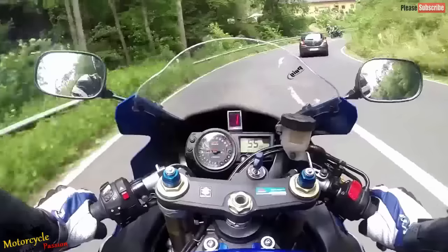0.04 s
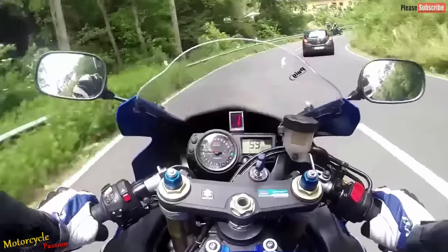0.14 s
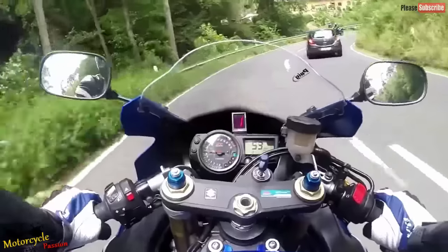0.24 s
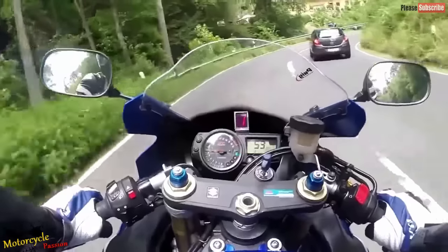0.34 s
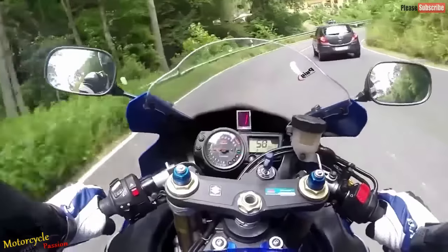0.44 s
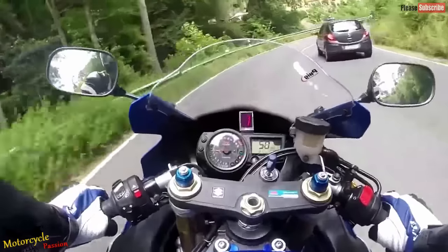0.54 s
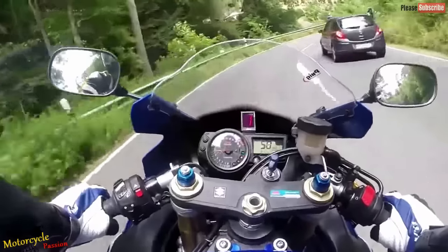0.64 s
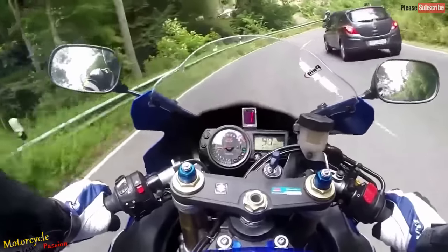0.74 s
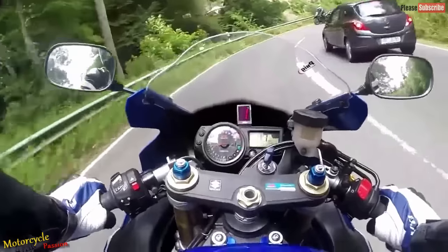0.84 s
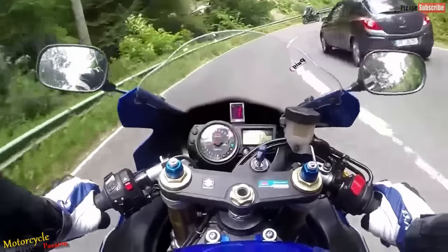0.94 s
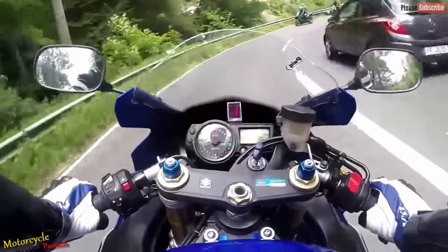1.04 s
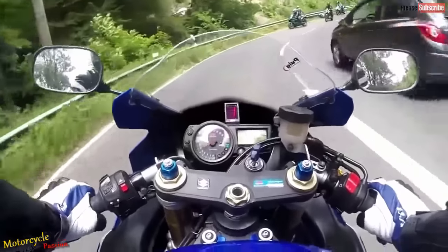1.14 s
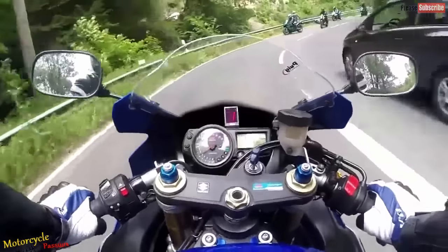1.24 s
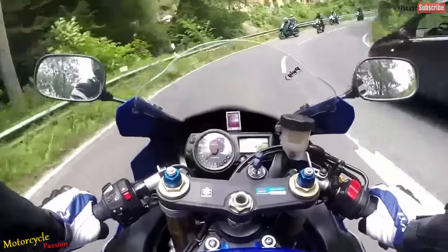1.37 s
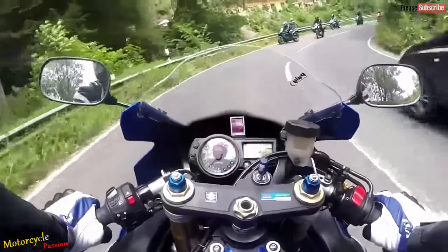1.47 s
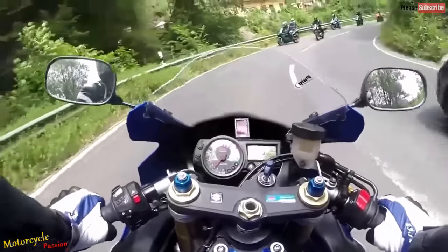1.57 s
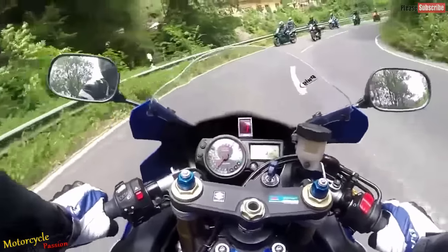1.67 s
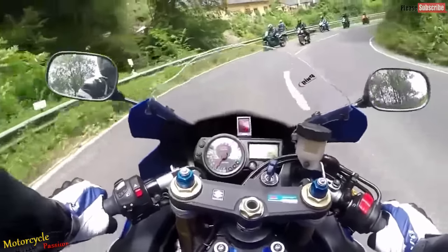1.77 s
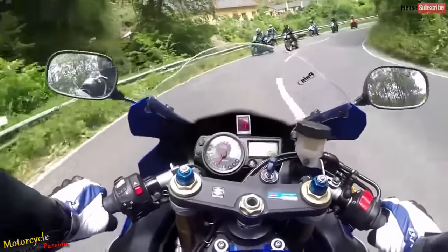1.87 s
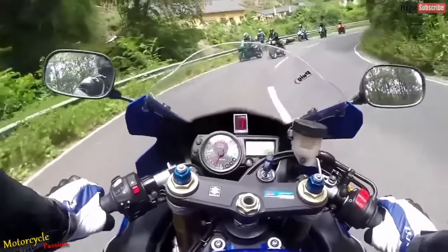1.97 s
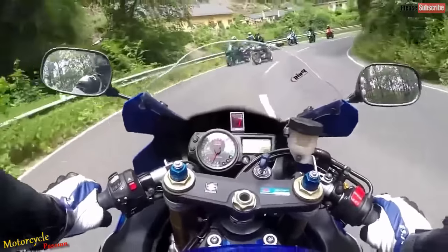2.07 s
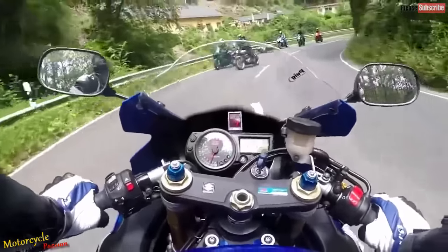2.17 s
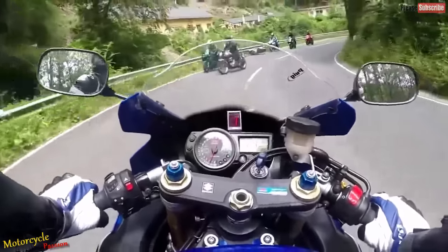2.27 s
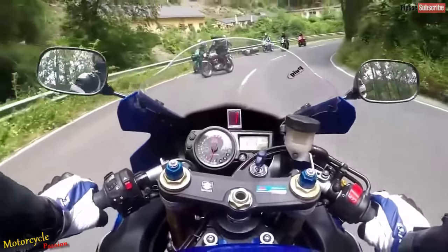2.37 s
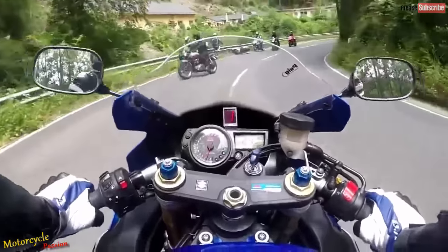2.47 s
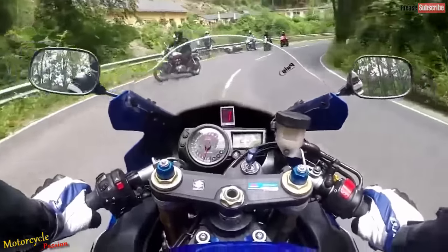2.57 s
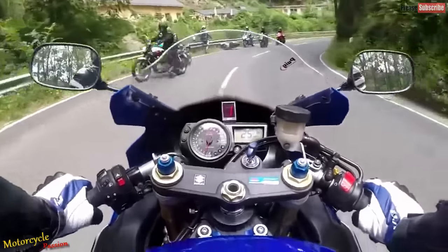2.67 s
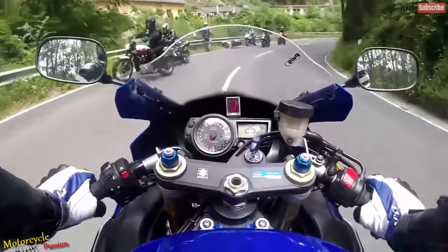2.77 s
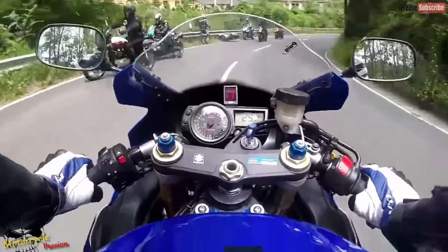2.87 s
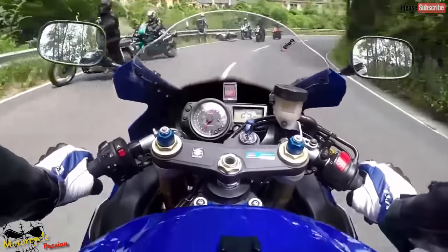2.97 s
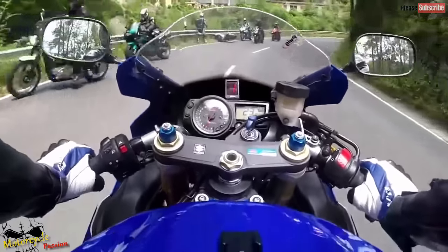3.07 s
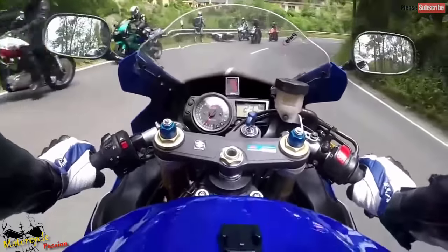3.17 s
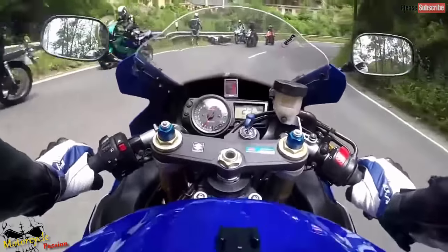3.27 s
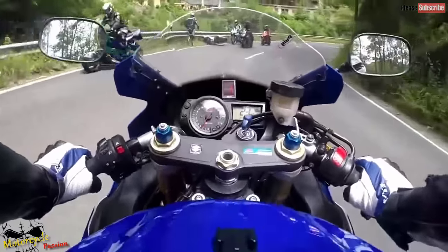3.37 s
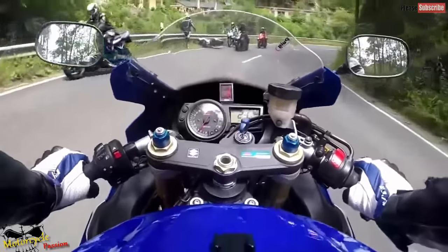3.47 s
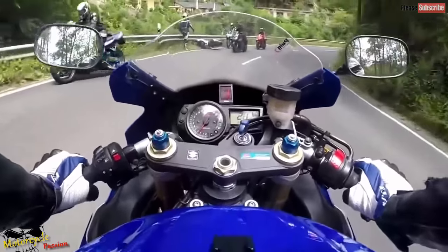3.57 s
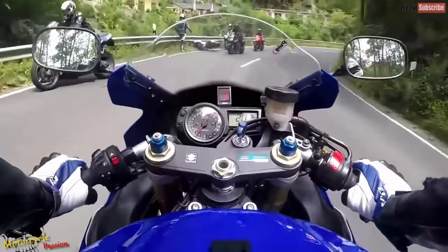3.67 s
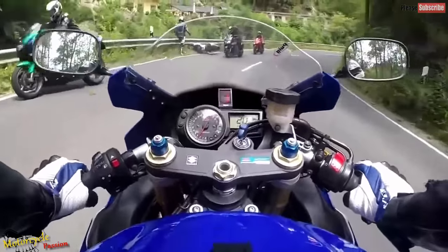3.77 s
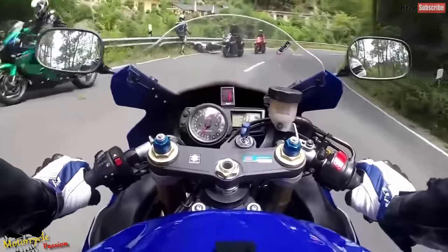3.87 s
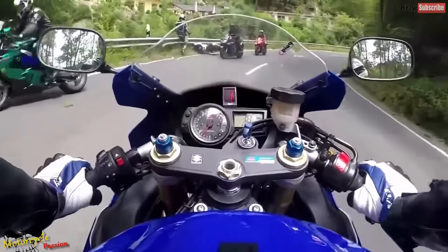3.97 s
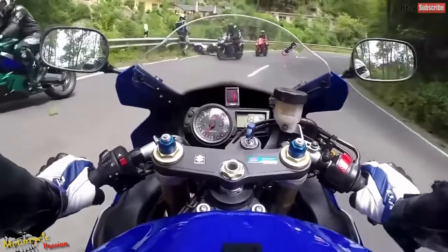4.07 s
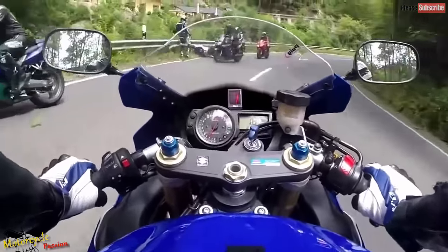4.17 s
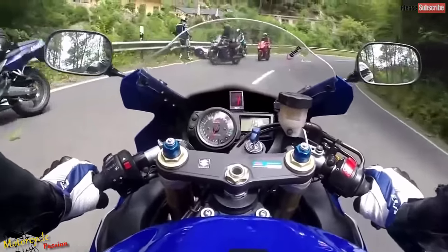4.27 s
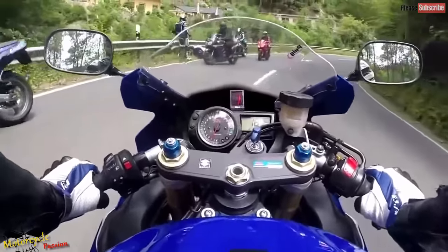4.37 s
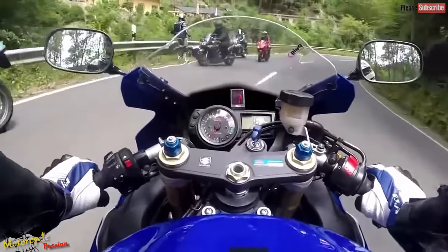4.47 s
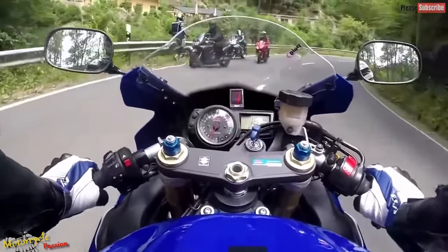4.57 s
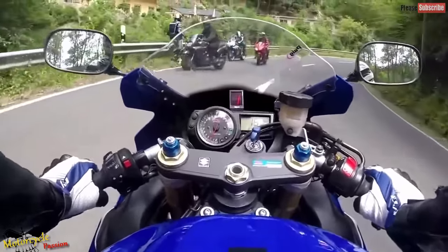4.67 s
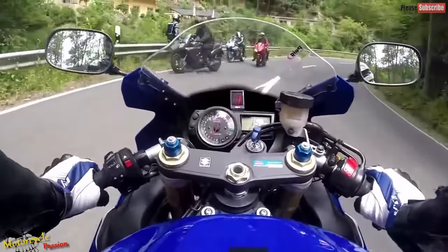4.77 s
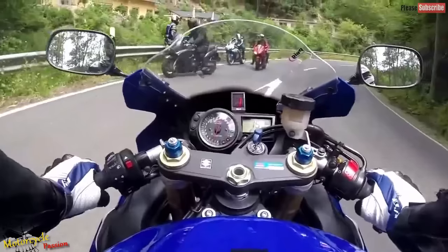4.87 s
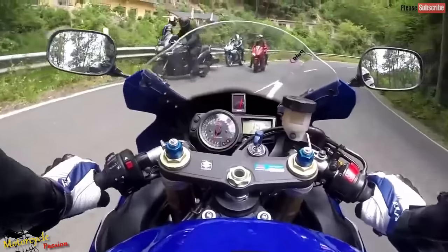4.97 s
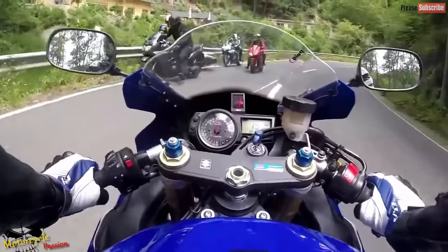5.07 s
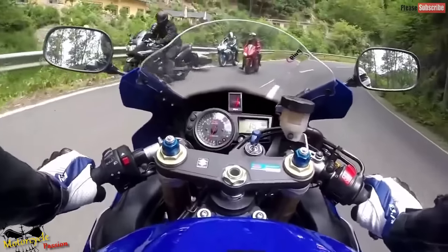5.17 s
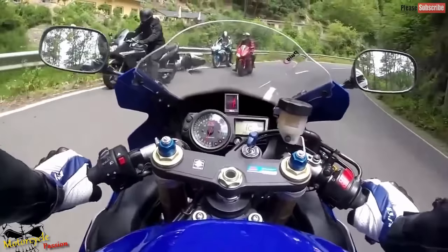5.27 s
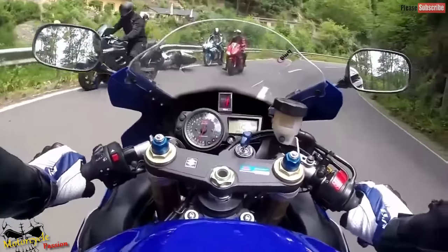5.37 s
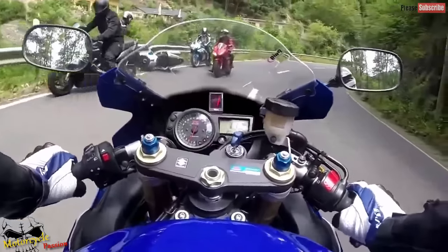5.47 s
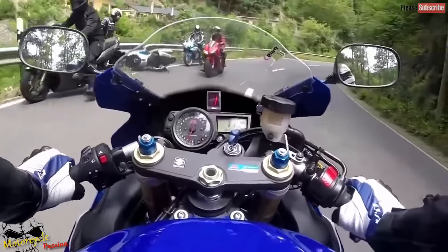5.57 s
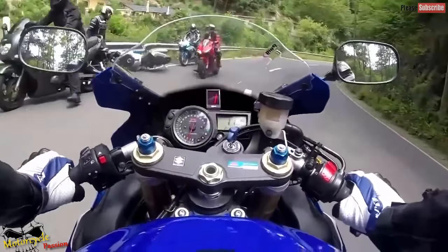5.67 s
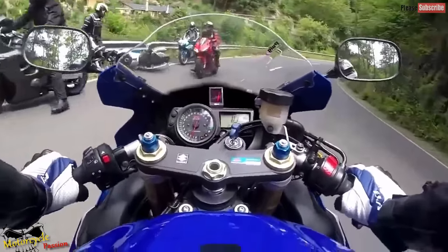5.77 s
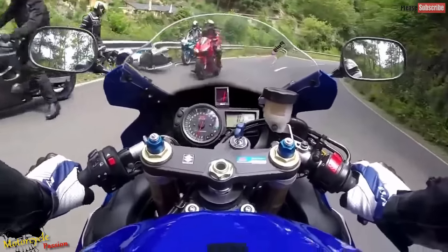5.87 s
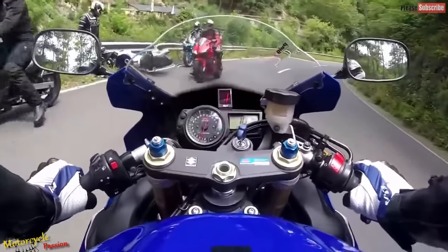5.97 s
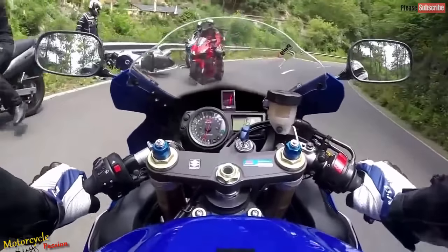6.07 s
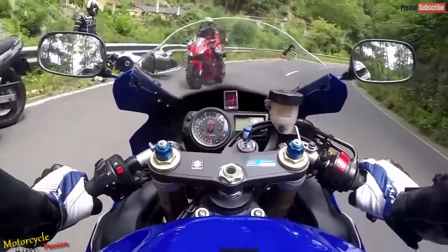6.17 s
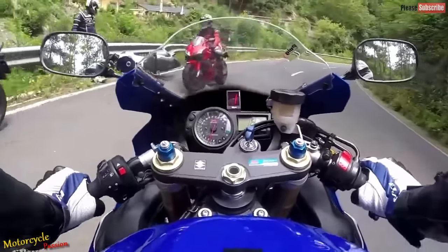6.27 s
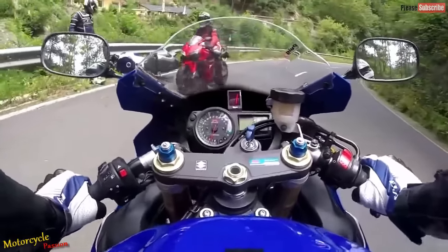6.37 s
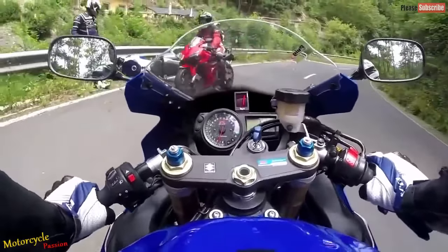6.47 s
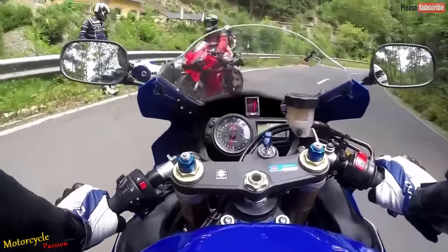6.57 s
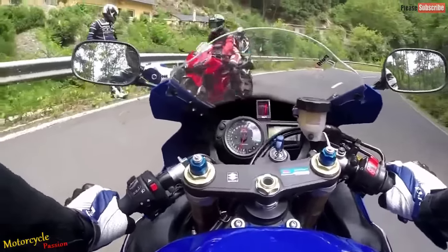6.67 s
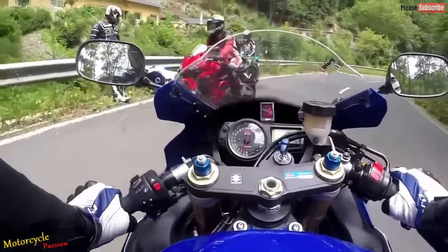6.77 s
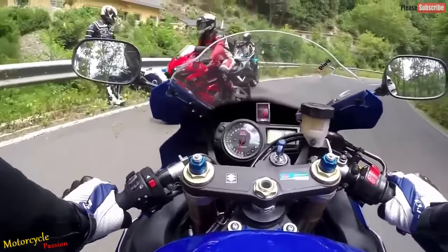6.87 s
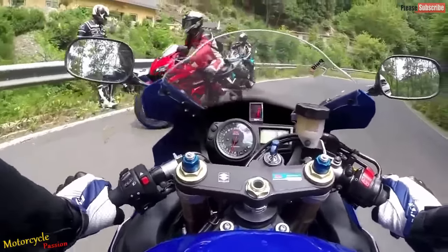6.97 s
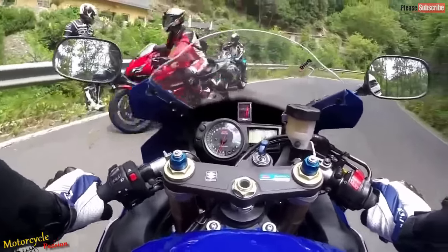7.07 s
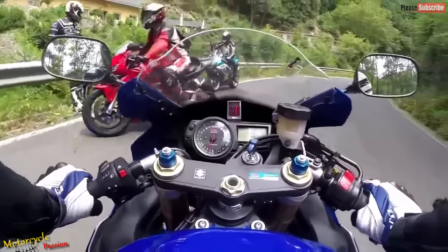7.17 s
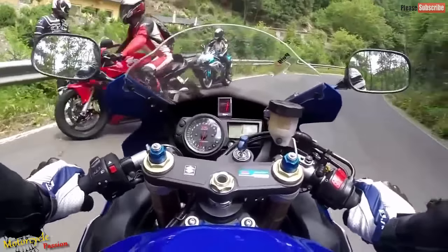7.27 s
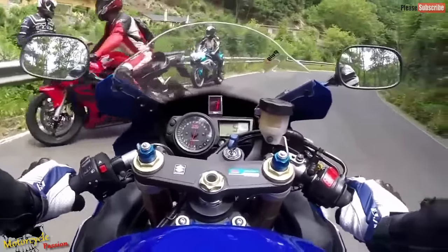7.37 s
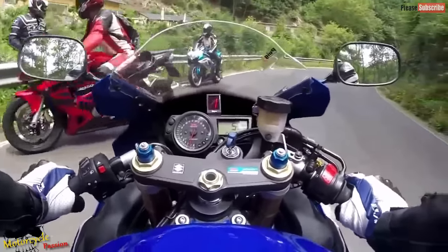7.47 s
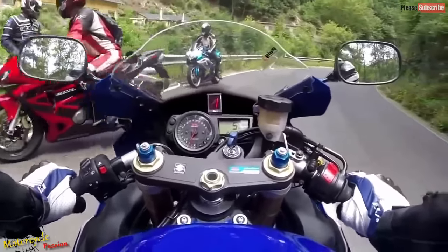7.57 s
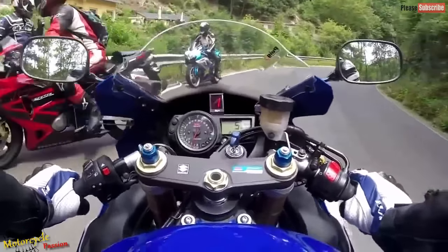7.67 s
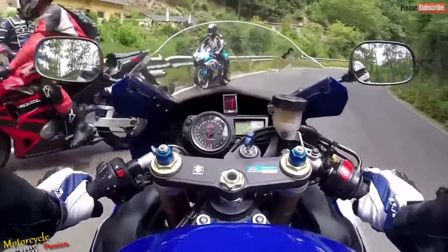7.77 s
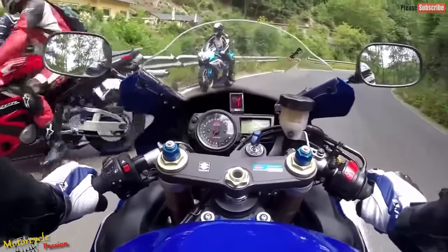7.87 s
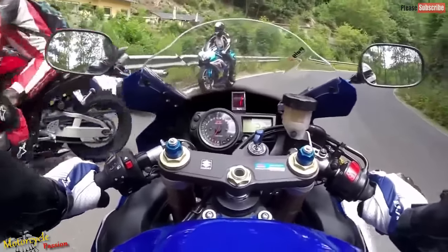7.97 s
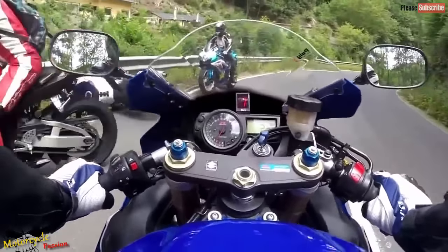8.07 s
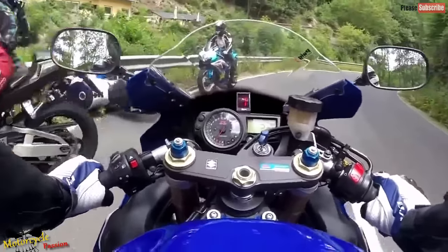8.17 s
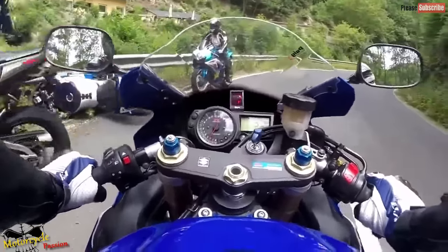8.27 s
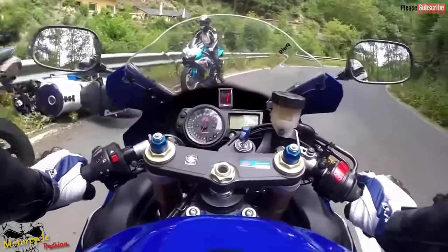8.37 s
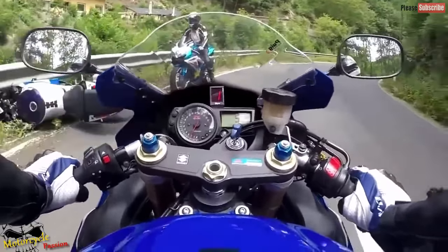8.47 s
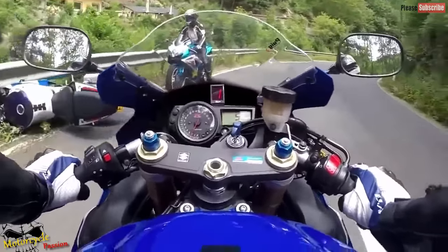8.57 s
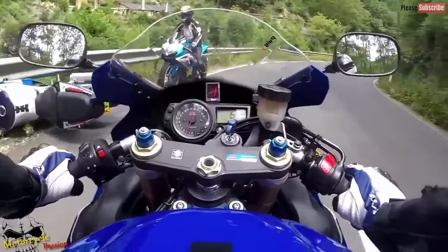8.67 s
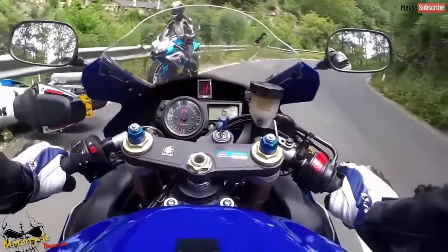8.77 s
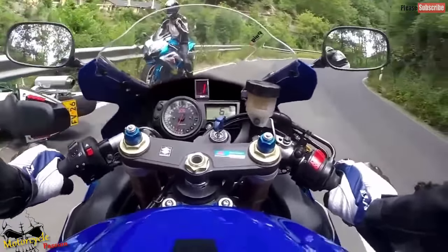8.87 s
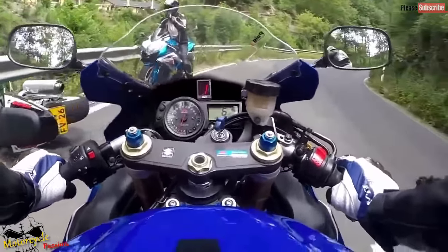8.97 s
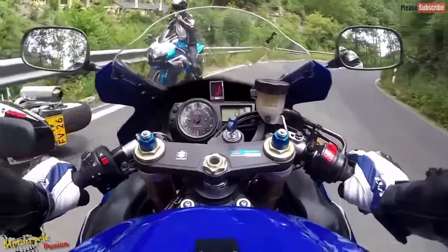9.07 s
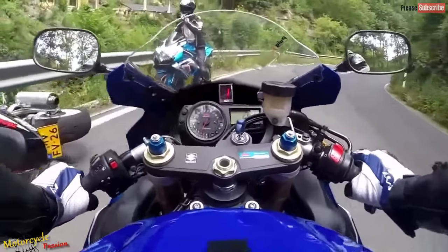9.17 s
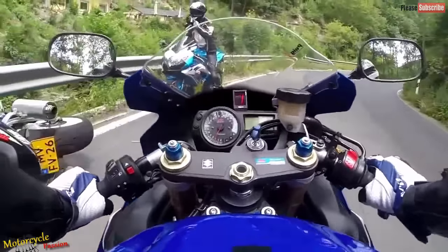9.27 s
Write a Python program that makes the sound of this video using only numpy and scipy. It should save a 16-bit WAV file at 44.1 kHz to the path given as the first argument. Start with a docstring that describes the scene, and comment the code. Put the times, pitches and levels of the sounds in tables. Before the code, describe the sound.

A four-cylinder sport motorcycle is heard close, from a cased microphone on the rider. A blast of wind and engine drone cuts at 0.2 seconds to falling revs, with bright metallic ticking and gear whine over a soft exhaust. The exhaust booms briefly near 1 second, and the engine sinks to idle by about 2.3 as the wind eases. From 1 second on, road bumps make irregular thumps, rattles and plastic clacks on the microphone mount. The revs flare on a downshift around 3 seconds, then sag to a burbling idle by 5.5. Oncoming motorcycles drone softly past at about 3.5, 4.2, 5.4 and 7.3 seconds. At 6.7 a hard jolt brings a sharp clack and a faint, thin squeak, followed by hollow knocks around 7. From 7.3 the engine picks up gently, dips near 9 and rises again.

```python
"""A four-cylinder sport motorcycle, heard from a cased camera on the rider. A moment of fast, buffeted
riding cuts to a closed throttle: the revs sink, valve gear and gearbox bright and near over a soft
exhaust. The clutch is pulled, the chain goes quiet, and bumps start to thump and clack the camera mount.
The revs flare on a downshift, oncoming bikes drone past, and the engine settles to idle. A hard jolt
brings a thin squeak, hollow knocks follow, and the bike picks up again at walking pace."""
import sys
import numpy as np
from scipy import signal
from scipy.fft import rfft, irfft, next_fast_len
from scipy.io import wavfile
from scipy.ndimage import uniform_filter1d, map_coordinates

SR = 44100
rng = np.random.default_rng(int(sys.argv[2]) if len(sys.argv) > 2 else 0)


def persist_wave(psi):
    """Save psi, clipped to +-1, as 16-bit WAV."""
    counts = np.round(np.clip(psi, -1, 1) * 32767).astype(np.int16)
    wavfile.write(sys.argv[1], SR, np.atleast_2d(counts).T)


N = 411585
TIME = np.arange(N) / SR
CUT_S = 0.1825  # the fast ride ends here
IDLE_HZ = 47.3  # firing rate; four firings make an engine cycle


def amp(db):
    """Decibels to gain."""
    return 10 ** (np.asarray(db) / 20)


def unit(x):
    """Scale to rms 1."""
    return x / np.sqrt(np.mean(x ** 2) + 1e-20)


def curves(rows, along=TIME):
    """Automation: one curve for each column after the first, read along time or another control."""
    points, *columns = np.transpose(rows)
    return [np.interp(along, points, column) for column in columns]


def wobble(rate):
    """A smooth random curve, rate knots a second."""
    return map_coordinates(rng.standard_normal(int(N * rate / SR) + 4), [TIME * rate])


def filtered(x, response):
    """EQ x with a gain given as a function of frequency."""
    size = next_fast_len(N + SR // 2)
    return irfft(rfft(x, size) * response(np.fft.rfftfreq(size, 1 / SR)), size)[:N]


def bell(hz, centre_hz, width_hz):
    """A resonance curve of height 1."""
    return 1 / (1 + (2 * (hz - centre_hz) / width_hz) ** 2)


def coloured(x, spectrum):
    """EQ x through (freq_hz, gain_db) points on a log axis, then scale to rms 1."""
    freq_hz, gain_db = np.transpose(spectrum)
    return unit(filtered(x, lambda hz: amp(np.interp(np.log(hz + 1), np.log(freq_hz), gain_db))))


def noise(spectrum):
    """Coloured noise of rms 1."""
    return coloured(rng.standard_normal(N), spectrum)


def add(track, start_s, sound):
    """Mix a sound into the track."""
    part = track[round(start_s * SR):][:len(sound)]
    part += sound[:len(part)]


# Drone of the engine pulling hard: firing_multiple, level_db
DRONE_PARTIALS = [(.25, -27), (.5, -45), (1, -25), (2, -31.5), (3, -47)]
# Roar of the fast airstream: freq_hz, gain_db
AIRSTREAM_EQ = [(240, -31), (400, -11), (436, -0.5), (488, -8.5), (748, -5), (1660, -11.5), (2180, -5.5),
                (3060, -43), (3190, -43), (3580, -39), (4070, -63), (5180, -40), (12000, -86),
                (15600, -116), (22000, -120)]
# Low lumps of air on the case: freq_hz, gain_db
BUFFET_EQ = [(5, -6), (16, 3.5), (35, -5.5), (60, -11), (120, -6.5), (400, -89)]
# Rush of air and tyres: freq_hz, gain_db
RUSH_EQ = [(20, 0.5), (60, 0.5), (110, 2.5), (200, -7), (320, -7), (480, -16.5), (750, -21.5),
           (1100, -19.5), (2000, -16), (6000, -48), (15000, -76)]

def fast_ride(start_hz=141, end_hz=128):
    """At speed the engine drones hard and the airstream hammers the case with a dull roar."""
    firing = 2 * np.pi * np.cumsum(np.interp(TIME, [0, CUT_S], [start_hz, end_hz])) / SR
    drone = sum(np.sqrt(2) * amp(db + 1.8 * wobble(30)) * np.sin(k * firing) for k, db in DRONE_PARTIALS)
    roar = noise(AIRSTREAM_EQ) * amp(-31 + 3.6 * wobble(54.4))
    return drone + roar + amp(-24.5) * noise(BUFFET_EQ) + amp(-30) * noise(RUSH_EQ)


# The revs after the cut: time_s, firing_hz
REV_CURVE = [(.18, 214), (.68, 195), (.94, 186.7), (1.08, 177.5), (1.2, 162), (1.45, 120), (1.8, 76),
             (2, 57), (2.3, 45), (2.87, 51), (3.18, 89.3), (3.42, 85), (3.87, 72.7), (4.1, 66), (4.5, 55),
             (5.3, 47), (5.9, 43.5), (6.6, 43.5), (7.3, 48), (7.7, 68.5), (7.87, 72.7), (8.03, 71.3),
             (8.22, 73.8), (8.28, 72.8), (8.4, 74.7), (8.55, 71.5), (8.95, 57), (9.33, 74)]

def crankshaft():
    """Firing rate in Hz and engine cycles turned; uneven combustion makes the cycles stumble."""
    firing_hz = curves(REV_CURVE)[0]
    stumble_hz = 0.2003 * wobble(18)
    return firing_hz, np.cumsum(firing_hz + stumble_hz) / SR / 4


# The rider opens the throttle: start_s, end_s, opening (0-1)
THROTTLE_MOVES = [(2.803, 3.05, 0.2), (7.307, 8.454, 0.97), (8.91, 9.4, 1)]

def load(build_s=0.36, release_s=0.81):
    """Engine load 0-1: it builds while the throttle is open and dies away after it closes."""
    return sum(opening * np.clip((TIME - start_s) / build_s, 0, 1)
               * np.clip(1 - (TIME - end_s) / release_s, 0, 1)
               for start_s, end_s, opening in THROTTLE_MOVES)


def ticks(cycles, pattern, scatter_db, jitter_s):
    """Impulses at the pattern's angles (0-1) and sizes in each engine cycle, even in power at all revs."""
    angles, strengths = pattern
    count = int(cycles[-1])
    due = (np.arange(count)[:, None] + angles).ravel()
    place = np.interp(due, cycles, np.arange(N)) + jitter_s * SR * rng.standard_normal(len(due))
    sizes = np.tile(strengths, count) * amp(scatter_db * rng.standard_normal(len(due)))
    taps = np.floor(place)[:, None] + np.arange(-7, 9)
    offset = taps - place[:, None]
    shape = np.sinc(offset) * np.cos(np.pi * offset / 16) ** 2  # lands each tick between samples
    slots = np.clip(taps, 0, N).astype(int).ravel()
    train = np.bincount(slots, (sizes[:, None] * shape).ravel(), N + 1)[:N]
    return unit(train / np.sqrt(np.gradient(cycles)))


def chug(depth_db=2.6, rate=13):
    """An uneven gain of rms 1: the lumps and short dips of slow engines and air."""
    return unit(amp(depth_db * np.minimum(wobble(rate), 1)))


# The pipe booms at some revs and not at others: firing_hz, tone_db, puff_db
PIPE_LEVELS = [(44.4, -52.5, -50.5), (60, -43, -52.5), (73, -46, -54), (91, -49.5, -54), (160, -40, -45),
               (182.4, -42, -39), (188, -30, -38), (201, -41.5, -40), (207.6, -37.5, -49)]
# Colour of the puffs through the silencer: freq_hz, gain_db
SILENCER_EQ = [(40, -30), (90, -8), (140, 0), (210, -9), (290, -1), (430, 1), (510, -9), (620, -3),
               (740, -9), (850, -7), (1100, -14), (1600, -21), (4000, -60)]
# Deep burble of the idling exhaust: freq_hz, gain_db
BURBLE_EQ = [(30, -15), (90, 10), (150, -2), (230, 2.5), (330, -5.5), (500, -25), (1200, -50)]

def exhaust(firing_hz, cycles, octave_db=-12, load_tone_db=7.5, load_puff_db=8.5):
    """A round firing tone and four slightly unequal puffs a cycle; revs and load set their strength."""
    tone_db, puff_db = curves(PIPE_LEVELS, along=firing_hz)
    firing = 2 * np.pi * 4 * cycles
    tone = unit((np.sin(firing) + amp(octave_db) * np.sin(2 * firing)) * amp(2 * wobble(22)))
    cylinders = np.array([0, .254, .5, .747]), np.array([1.18, .82, 1.04, .96])  # angles, sizes
    puffs = coloured(ticks(cycles, cylinders, scatter_db=1.1, jitter_s=.00006), SILENCER_EQ)
    # slow puffs are rounder than fast ones
    rounded = filtered(puffs, lambda hz: 1 / np.hypot(1, (hz / 530) ** 5))
    sharpness = np.clip(firing_hz / 120 - .55, 0, 1)
    running = rounded + sharpness * (puffs - rounded)
    # near idle the charges burn unevenly and the burble takes over
    burble = chug() * coloured(ticks(cycles, cylinders, scatter_db=3, jitter_s=.0004), BURBLE_EQ)
    firmness = np.clip((firing_hz - 50) / 22, .12, 1)
    breath = firmness * running + amp(-0.5) * (1 - firmness) * burble
    return tone * amp(tone_db + load_tone_db * load()) + breath * amp(puff_db + load_puff_db * load())


# Rings of the engine castings: pitch_hz, width_hz, lift_db
CASTING_RINGS = [(1480, 88, 3), (1726, 190, 0.5), (2506, 150, 5), (2710, 110, -2), (2820, 140, 0.5),
                 (3640, 130, -2.5), (3816, 120, 6), (4240, 150, 2), (5290, 210, -8), (5540, 330, 8.5),
                 (6350, 200, -2.5), (6530, 320, 3.5)]
# Bright metal colour of the valve gear: freq_hz, gain_db
VALVE_EQ = [(590, -9.5), (1000, -11.5), (1120, -14), (1500, -3), (1860, 1), (2530, -1), (2710, -3),
            (2930, 0), (4220, -6), (5170, -6.5), (5600, -9.5), (6630, -10), (8320, -23.5), (10300, -26),
            (15000, -36.5)]
# Small fader moves on the clatter: time_s, trim_db
CLATTER_FADER = [(1.4, 0), (1.9, 0.4), (3.4, 0), (3.9, -0.5), (4.5, -0.5), (5.1, 0.5), (8.7, -.5),
                 (9.2, 0.5)]

def valve_clatter(firing_hz, cycles, idle_db=-43.5, db_per_octave=4.5, load_db=-0.55, waver=.012):
    """Valves and chain links tick at fixed crank angles over a hiss of moving parts; the castings ring."""
    def castings(hz):
        return amp(sum(db * bell(hz, pitch_hz, width_hz) for pitch_hz, width_hz, db in CASTING_RINGS))

    pattern = rng.random(size=80), np.ones(80)
    taps = ticks(cycles, pattern, scatter_db=1.5, jitter_s=.000008)
    tick_gain = 0.62 + 0.0018 * firing_hz  # ticks stand out of the hiss as the revs rise
    drive = unit(tick_gain * taps + rng.standard_normal(N))
    flat = filtered(drive, lambda hz: castings(hz * (1 + waver)))
    sharp = filtered(drive, lambda hz: castings(hz * (1 - waver)))
    ringing = flat + np.clip(.5 + .5 * wobble(17), 0, 1) * (sharp - flat)
    # slow parts strike softly: they lose their top and leave the castings' ring exposed
    softness = np.clip(1 - firing_hz / 170, 0, 1)
    exposed = np.clip(0.92 + 1.3 * softness, 0, 1)
    metal = coloured(drive + exposed * (ringing - drive), VALVE_EQ)
    top = filtered(metal, lambda hz: hz ** 2 / (hz ** 2 + 3500 ** 2))
    octaves = np.log2(firing_hz / IDLE_HZ)
    revs_db = idle_db + db_per_octave * octaves + 1.2246 * octaves ** 2  # grows ever faster
    level_db = revs_db + load_db * load() + curves(CLATTER_FADER)[0] + 0.68 * wobble(14)
    return (metal - 0.6 * softness * top) * amp(level_db)


def cover_ring(firing_hz, pitch_hz=1998, width_hz=85, idle_db=-52.5, db_per_octave=3):
    """A casing, likely the clutch cover, rings in uneven pulses; it stands out at low revs."""
    ring = filtered(rng.standard_normal(N), lambda hz: bell(hz, pitch_hz, width_hz))
    octaves = np.log2(np.minimum(firing_hz, 140) / IDLE_HZ)
    return unit(ring * chug()) * amp(idle_db + db_per_octave * octaves)


# Whines of the cam drive and pumps at top revs: firing_multiple, level_db
CAM_PARTIALS = [(8.5, -43), (9, -47), (11.25, -48), (12.75, -45), (14.5, -48)]

def cam_and_pumps(firing_hz, cycles):
    """Cam drive and pumps sing in rough tones that fall with the revs and sink into the clatter."""
    firing = 2 * np.pi * 4 * cycles
    tones = sum(unit(np.sin(k * firing + .6 * wobble(50)) * amp(3 * wobble(12))) * amp(db)
                for k, db in CAM_PARTIALS)
    return tones * (firing_hz / firing_hz.max()) ** 2.74


# The gearbox whine runs down; then the primary gear's mesh, at twice its tooth rate, rises as the revs flare
# and runs down again: time_s, pitch_hz, level_db
MESH_WHINE_CURVE = [(.18, 4400, -42), (.45, 4150, -46), (.75, 4170, -43), (1.1, 3690, -44), (1.3, 3300, -48),
                    (1.45, 3020, -45), (1.58, 2830, -48), (1.75, 2600, -58), (2.3, 2100, -76),
                    (2.9, 2324, -58), (3.08, 3120, -51), (3.18, 3660, -47), (3.42, 3490, -50),
                    (3.6, 3270, -53), (3.76, 3090, -55), (3.84, 3000, -48), (3.97, 2900, -52),
                    (4.14, 2800, -54), (4.4, 2500, -66), (5, 2200, -80)]

def mesh_whine(teeth=21, runout=.5):
    """Meshing teeth whine roughly with the shaft speed, swelling once every turn of the shaft."""
    pitch_hz, level_db = curves(MESH_WHINE_CURVE)
    phase = 2 * np.pi * np.cumsum(pitch_hz) / SR
    mesh = np.sin(phase + .9 * wobble(130)) * (1 + runout * np.cos(phase / teeth))
    return unit(mesh * amp(2.8 * wobble(45))) * amp(level_db)


def chain(cycles, firing_multiple=3.67, level_db=-48, clutch_s=1.05, slacken_s=0.22):
    """The taut chain hums on its sprocket until the clutch is pulled and it goes slack."""
    links = np.sin(2 * np.pi * 4 * firing_multiple * cycles + .4 * wobble(40))
    taut = np.clip(1 - (TIME - clutch_s) / slacken_s, 0, 1)
    return amp(level_db) * taut * unit(links * amp(2.7 * wobble(18.6)))


# Fader on the air and tyres after the cut: time_s, level_db
RUSH_FADER = [(.2, -37.5), (.55, -40.5), (.95, -34.5), (1.2, -41.5), (2.1, -42), (2.5, -46), (3.4, -44.5),
              (4.7, -46), (6.2, -48.5), (7.2, -46), (8.5, -48.5), (9.33, -41.5)]

def wind(buffet_db=-41, buffet_db_per_s=-0.55):
    """Slow lumps of air on the case and a rush of air and tyres, both easing as the bike slows."""
    buffet = unit(noise(BUFFET_EQ) * amp(1.2 * wobble(6.7))) * amp(buffet_db + buffet_db_per_s * TIME)
    rush = noise(RUSH_EQ) * amp(curves(RUSH_FADER)[0] + 1.37 * wobble(16)) * chug()
    return buffet + rush


# Bumps jolt the camera and its joint hits the stop: start_s, thump_db, clack_db
ROAD_BUMPS = [(.975, -24.5, -38), (1.35, -23.5, -38), (1.455, -22.5, -38), (1.55, -23, -22),
              (1.625, -22.5, -25), (1.636, -28, -18), (1.728, -22, -27), (1.828, -21.5, -38),
              (1.865, -27, -24.5), (2.07, -28, -34), (2.215, -28, -20.5), (2.293, -26, -20.5),
              (2.612, -27, -31.5), (2.735, -22.5, -31), (3.104, -37, -26.5), (3.212, -31, -19),
              (3.314, -22.5, -15.5), (3.377, -22.5, -21), (3.422, -26, -28), (3.519, -24, -26),
              (3.583, -23, -26), (3.657, -26, -38), (3.75, -24, -26), (3.897, -26, -21),
              (4.194, -32, -18.5), (4.275, -28, -29), (4.54, -44, -22.5), (5.22, -24.5, -25.5),
              (5.745, -31.5, -21.5), (6.103, -55, -23), (6.455, -29, -21.5), (6.548, -32.5, -26),
              (6.677, -26, -12.5), (7.072, -31.5, -33), (7.335, -28.5, -29), (7.371, -31, -22),
              (7.92, -25, -25), (8.068, -31, -26.5), (8.893, -25.5, -31), (8.918, -27.5, -43),
              (8.942, -26, -15.5), (9.317, -30, -23)]
# The mount shudders on after hard jolts: start_s, thump_db, clack_db
MOUNT_SHUDDERS = [(2.76, -25.5, -34), (6.711, -25, -25), (6.752, -25.5, -31)]

def jolts(gap_s=0.016, loss_db=1.5, jiggle_db=-36):
    """Cue list (start_s, thump_db, clack_db) of bumps, dying rebounds and small rough-road jiggles."""
    rebounds = [(start_s + k * gap_s * (1 + .08 * slip), thump_db - k * loss_db, clack_db - k * loss_db)
                for start_s, thump_db, clack_db in MOUNT_SHUDDERS
                for k, slip in enumerate(rng.standard_normal(size=4))]
    jiggles = [(start_s, jiggle_db + 2.3 * force, jiggle_db + 2 * force)
               for start_s, force in zip(rng.uniform(1.5, 8.9, size=16), rng.standard_normal(size=16))]
    return ROAD_BUMPS + rebounds + jiggles


def blow(modes, detune, attack_s, crack_db, body_db=0):
    """One hit of peak 1: damped modes, varied each time, and a tiny crack; body_db lifts the lowest."""
    t = np.arange(SR // 10) / SR
    pitch_hz, width_hz, level_db = np.transpose(modes)[:, :, None]
    bend, size = rng.standard_normal((2, len(modes), 1))
    level_db = level_db + 2 * size + body_db * (pitch_hz == pitch_hz.min())
    envelopes = amp(level_db) * np.exp(-np.pi * width_hz * t)
    rings = envelopes * np.sin(2 * np.pi * pitch_hz * (1 + detune * bend) * t)
    crack = amp(crack_db) * np.exp(-t / 0.0027) * rng.standard_normal(len(t))
    wave = (rings.sum(0) + crack) * (1 - np.exp(-t / attack_s))
    return -wave / np.abs(wave).max()


# Low thump of the mount: pitch_hz, width_hz, level_db
MOUNT_MODES = [(72, 91, -28), (122, 32, 6), (175, 52, -6.5), (312, 70, -7.5), (510, 320, -22)]
# Plastic clack of the case: pitch_hz, width_hz, level_db
CASE_MODES = [(1400, 200, -7), (2110, 120, 3), (2347, 220, 11), (2770, 150, -1), (3560, 110, -10),
              (4260, 180, -9.5), (5400, 410, -24), (6400, 270, -15)]
# Rattle of the loose mount: freq_hz, gain_db
RATTLE_EQ = [(100, -4), (250, 0.5), (550, -4), (900, -9.5), (2500, -4.5), (7000, -42)]
# Hollow knocks, likely the gear lever: start_s, peak_db
HOLLOW_KNOCKS = [(6.9564, -17), (6.9756, -26), (7.0059, -23.5), (7.0261, -27), (7.0366, -26.5)]

def camera_mount():
    """Bumps rock the mount with a short rattle, its plastic joint clacks, and knocks ring the case."""
    thumps, clacks = np.zeros((2, N))
    for start_s, thump_db, clack_db in jolts():
        body_db = 3 + 0.37 * (thump_db - clack_db)  # a heavier thump gives the clack more body
        thump = blow(MOUNT_MODES, detune=.11, attack_s=.00055, crack_db=-46)
        clack = blow(CASE_MODES, detune=.03, attack_s=.00039, crack_db=-32, body_db=body_db)
        add(thumps, start_s + .00098, amp(thump_db) * thump)
        add(clacks, start_s, amp(clack_db) * clack)
    for start_s, peak_db in HOLLOW_KNOCKS:
        thump = blow(MOUNT_MODES, detune=.11, attack_s=.0005, crack_db=-44)
        knock = blow(CASE_MODES, detune=.03, attack_s=.00027, crack_db=-34, body_db=13.5)
        add(thumps, start_s, amp(peak_db - 12.5) * thump)
        add(clacks, start_s, amp(peak_db) * knock)
    rocking = np.sqrt(np.abs(uniform_filter1d(thumps ** 2, size=400)))  # envelope of the thumps
    return thumps + amp(-10) * rocking * noise(RATTLE_EQ) + clacks


# The primary gear swells when it is loaded: time_s, level_db
PRIMARY_FADER = [(2.8, -72), (2.97, -53), (3.14, -48), (3.25, -60), (4.1, -64), (4.6, -76), (7.45, -72),
                 (7.65, -59), (7.88, -57), (7.97, -48.5), (8.1, -50), (8.42, -48), (8.58, -57), (8.73, -55),
                 (8.85, -70), (9.33, -57)]

def primary_gear(cycles, teeth_per_cycle=82):
    """The teeth of the primary gear sing at a pitch that follows the revs."""
    mesh = np.sin(2 * np.pi * teeth_per_cycle * cycles + .7 * wobble(70))
    return unit(mesh * amp(1.8 * wobble(30))) * amp(curves(PRIMARY_FADER)[0])


# Oncoming bikes: alongside_s, firing_hz, speed_m_per_s, gap_m, source_db, rolloff (harmonic exponent)
ONCOMING_BIKES = [(3.55, 122, 6.96, 2.58, -41.5, 1.5), (4.2, 72, 6.8, 2.82, -40, 1.6),
                  (5.42, 48.94, 6.44, 2.19, -40, 1), (7.3, 47.84, 5.14, 1.94, -40.5, .9)]

def passing_bike(alongside_s, firing_hz, speed_m_per_s, gap_m, source_db, rolloff):
    """An oncoming bike at low revs: its drone swells and sinks in pitch as it goes by."""
    distance_m = np.hypot(gap_m, speed_m_per_s * (TIME - alongside_s))
    firing = 2 * np.pi * np.cumsum(firing_hz * (1 + 0.03 * wobble(25))) / SR
    phase = firing - 2 * np.pi * firing_hz * distance_m / 343  # travel time gives the Doppler bend
    drone = unit(sum(np.sin(k * phase) / k ** rolloff for k in range(1, 7)))
    shielding = 1 / (1 + (distance_m / 5) ** 2)  # the fairing hides it until it is alongside
    return amp(source_db) * gap_m / distance_m * shielding * chug() * (drone + 0.37 * noise(RUSH_EQ))


# Bright snaps on the sharpest jolts: start_s, peak_db
PLASTIC_SNAPS = [(5.22, -27), (6.677, -21), (6.9565, -30), (7.072, -32)]

def snaps(decay_s=0.0011):
    """Tiny bright cracks of hard plastic."""
    track, t = np.zeros(N), np.arange(SR // 50) / SR
    bright = signal.butter(1, [3500, 7000], "bandpass", fs=SR, output="sos")
    for start_s, peak_db in PLASTIC_SNAPS:
        crack = signal.sosfilt(bright, rng.standard_normal(len(t)) * np.exp(-t / decay_s))
        add(track, start_s, amp(peak_db) * crack / np.abs(crack).max())
    return track


def squeak(start_s=6.68, pitch_hz=12600, level_db=-56, attack_s=.01, decay_s=.05):
    """A thin squeak, perhaps the brake, after the hardest jolt."""
    age_s = np.maximum(TIME - start_s, 0)
    tone = np.sin(2 * np.pi * pitch_hz * TIME + 1.5 * wobble(300))
    return amp(level_db) * tone * np.minimum(age_s / attack_s, 1) * np.exp(-age_s / decay_s)


def scene(crossfade_s=0.0087):
    """The fast ride cuts to the slow one: engine, air, other bikes and mount, the same in both ears."""
    firing_hz, cycles = crankshaft()
    engine = exhaust(firing_hz, cycles) + valve_clatter(firing_hz, cycles) + cover_ring(firing_hz)
    whines = cam_and_pumps(firing_hz, cycles) + mesh_whine() + primary_gear(cycles) + chain(cycles)
    road = wind() + sum(passing_bike(*bike) for bike in ONCOMING_BIKES)
    slow_ride = engine + whines + road + camera_mount() + snaps() + squeak()
    fade = np.clip((TIME - CUT_S) / crossfade_s + .5, 0, 1)
    mono = (1 - fade) * fast_ride() + fade * slow_ride
    return np.array([mono, mono])


def record(dry):
    """A brick-wall low-pass takes off everything above 15.2 kHz."""
    return np.array([filtered(channel, lambda hz: hz < 15200) for channel in dry])


dry = scene()
out = record(dry)
persist_wave(out)
```